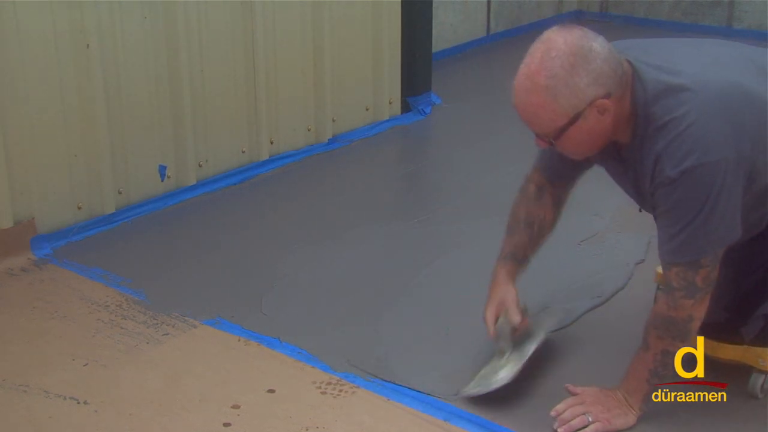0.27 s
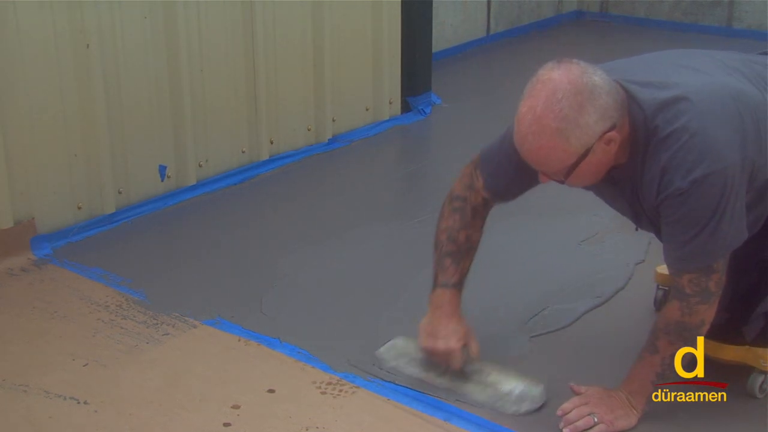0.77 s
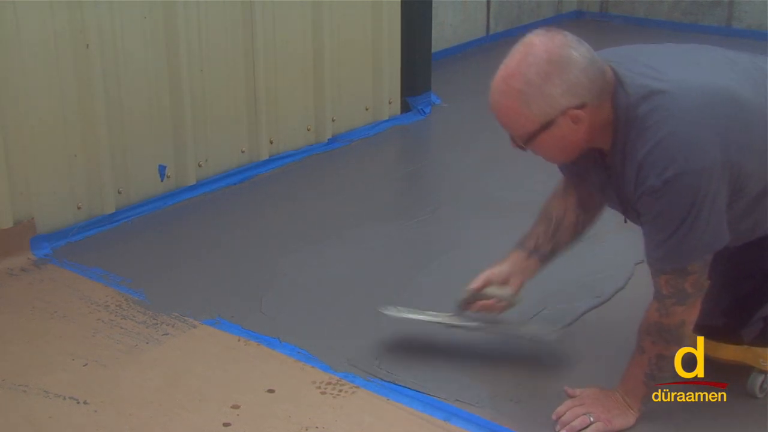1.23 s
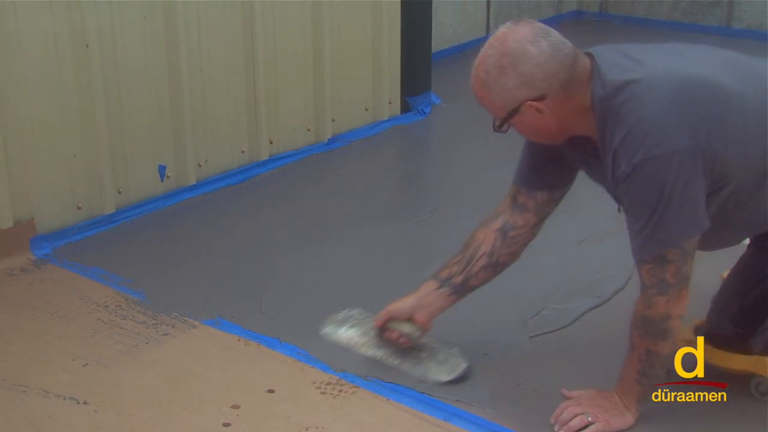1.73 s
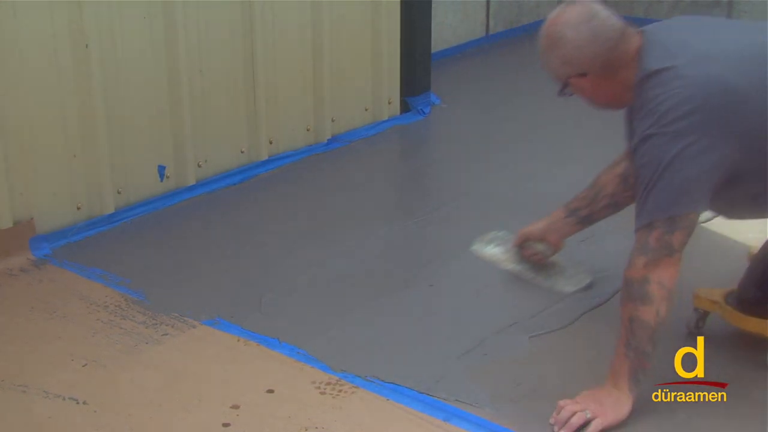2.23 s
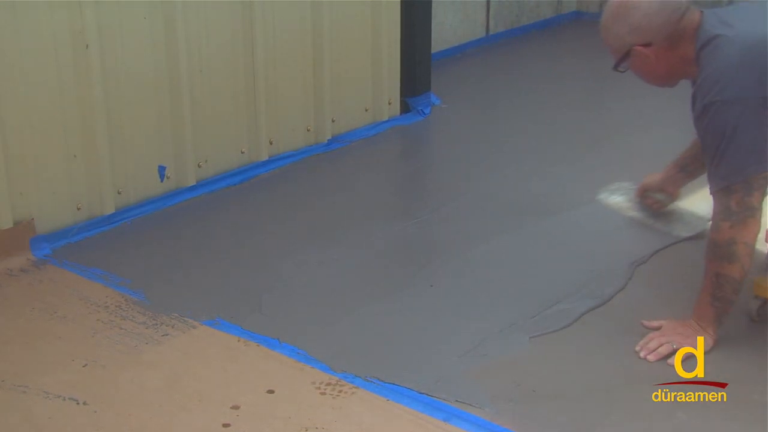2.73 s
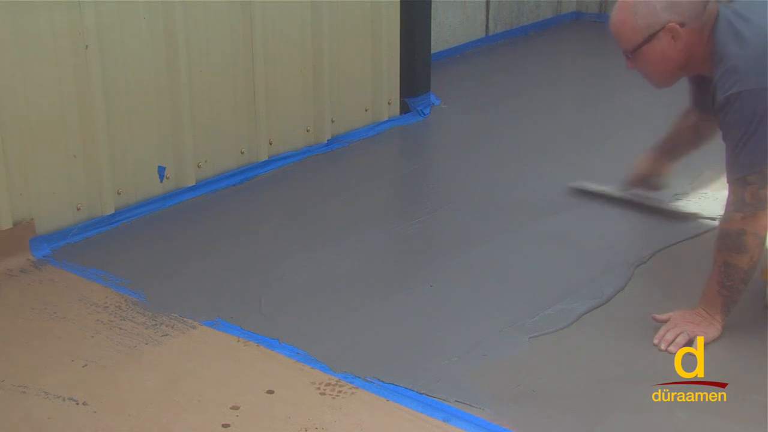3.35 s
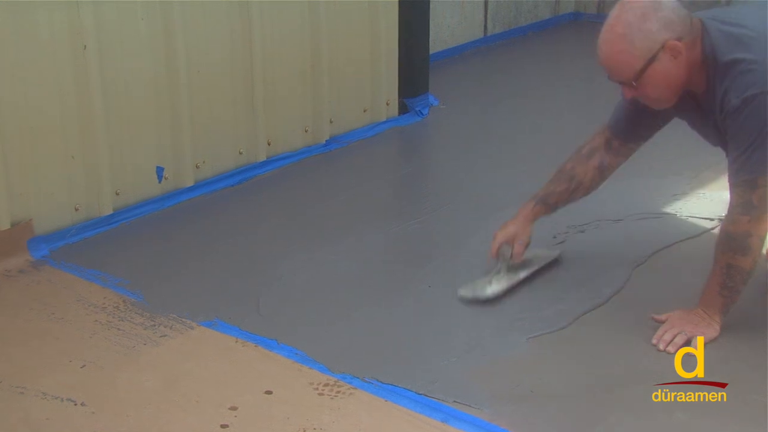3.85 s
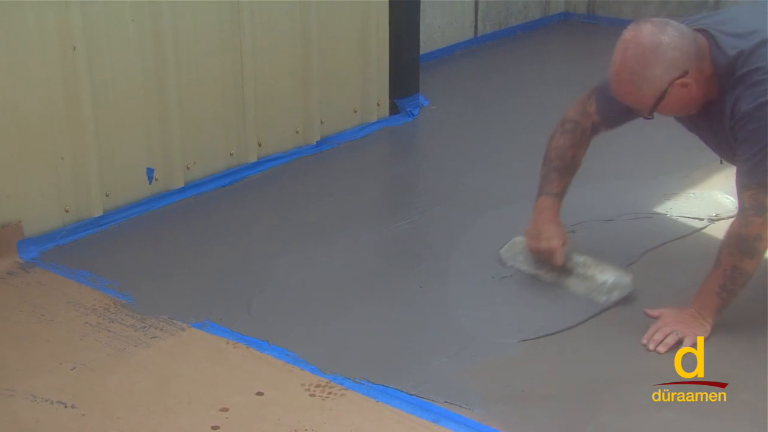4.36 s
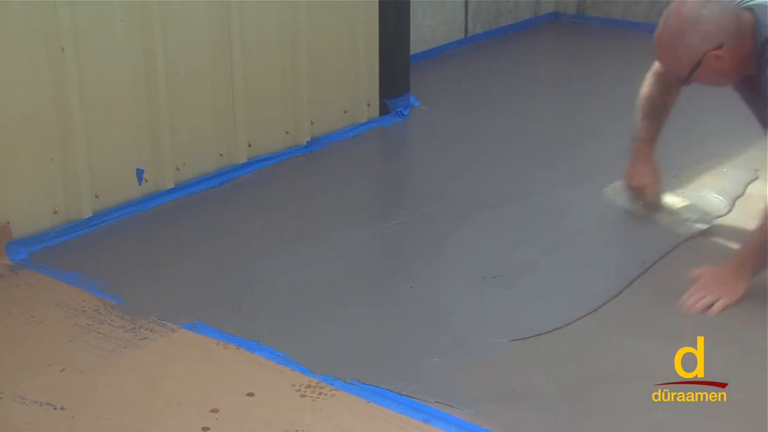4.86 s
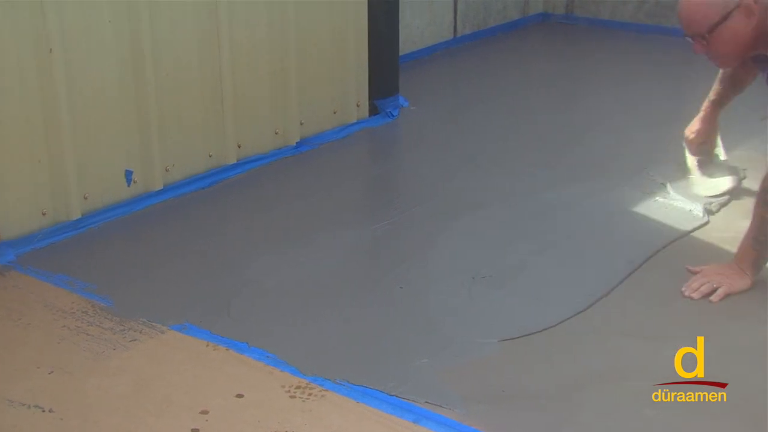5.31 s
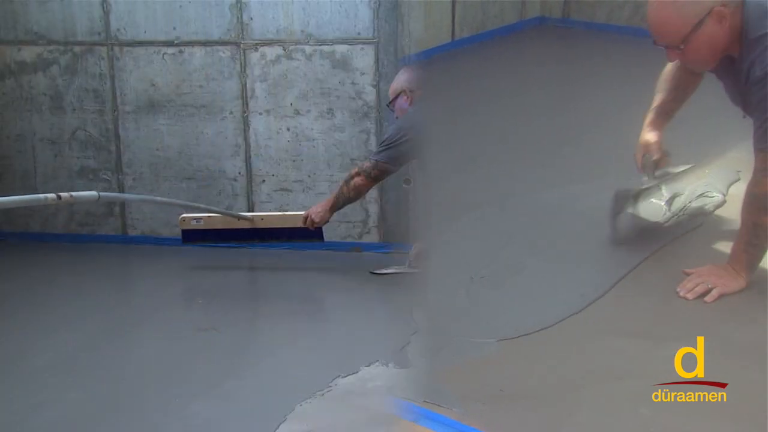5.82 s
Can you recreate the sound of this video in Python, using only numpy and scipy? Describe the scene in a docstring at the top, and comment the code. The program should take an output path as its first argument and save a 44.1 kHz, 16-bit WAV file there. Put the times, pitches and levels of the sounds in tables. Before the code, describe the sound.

A steel trowel rasps over gritty wet concrete in uneven strokes, two loud scrapes first, then softer swishes, over faint outdoor rumble.

```python
"""A steel trowel spreads wet concrete outdoors: sand grains striking its edge excite the damped resonances
of the blade in rasping strokes, while single coarse grains snap. Between strokes the flat blade glides
with fine crackle and hiss, and now and then friction makes its edge sing faintly in blurred partials.
Dull bumps of filtered impacts come from the worker shifting about; nearby walls answer with a short
diffuse tail, over low outdoor noise and a far motor of a few harmonic orders."""
import sys
import numpy as np
from scipy import signal
from scipy.fft import rfft, irfft, next_fast_len
from scipy.io import wavfile
from scipy.ndimage import map_coordinates

SR = 44100
rng = np.random.default_rng(int(sys.argv[2]) if len(sys.argv) > 2 else 0)


def materialize(psi):
    """Save the field psi as 16-bit PCM at rate SR to the path in sys.argv[1].

    A 1-D psi becomes a single channel; in a 2-D psi each row is a channel.
    """
    bounded = np.clip(np.atleast_2d(psi).T, -1, 1)
    quanta = np.round(bounded * 32767).astype(np.int16)
    wavfile.write(sys.argv[1], SR, quanta)


N = 268216

# spectrum of sand under the edge: f/Hz, level/dB
SAND_SPECTRUM = [(300, -7), (1000, 0.5), (2700, -5.5), (3700, -3), (5700, -1), (7000, -4.5), (10000, -2.5),
                 (15000, -3.5)]


def amp(db):
    """Level to amplitude ratio: 20 dB is a factor of ten."""
    return 10 ** (np.asarray(db) / 20)


def unit(x):
    """Normalization to a root-mean-square amplitude of 1."""
    return x / np.sqrt(np.mean(x ** 2) + 1e-20)


def along(points, hz):
    """Linear interpolation of (f/Hz, value) points on a logarithmic frequency axis."""
    f, value = np.transpose(points)
    return np.interp(np.log(hz + 1), np.log(f + 1), value)


def wobble(rate, size):
    """Band-limited random modulation: a spline through `rate` normal deviates a second."""
    knots = rng.standard_normal(int(size * rate / SR) + 4)
    return map_coordinates(knots, [np.arange(size) * rate / SR])


def filtered(x, response):
    """Linear filtering: the spectrum of x times a response of frequency."""
    m = next_fast_len(len(x) + 8192)  # zero padding leaves room for the filter to ring
    return irfft(rfft(x, m) * response(np.fft.rfftfreq(m, 1 / SR)), m)[:len(x)]


def hump(hz, centre_hz, octaves):
    """Gaussian band-pass on a logarithmic frequency axis, its standard deviation in octaves."""
    return np.exp(-.5 * (np.log2((hz + 1) / centre_hz) / octaves) ** 2)


def add(track, s, sound):
    """Superposition: mix a sound into the track at time s."""
    part = track[max(round(s * SR), 0):][:len(sound)]
    part += sound[:len(part)]


def swell(t, rise, hold, fade):
    """Contact envelope: linear rise, hold, then exponential decay of 20 dB per `fade` seconds."""
    decay_db = -20 * np.maximum(t - rise - hold, 0) / fade
    return np.clip(t / max(rise, 1e-3), 0, 1) * amp(decay_db)


def sand(size, rate, spread_db, smooth_db):
    """Granular friction: random impacts of scattered grain sizes over the smooth noise of the fines."""
    hit = rng.random(size) < rate / SR  # rate in impacts per second
    size_db = spread_db * np.minimum(rng.standard_normal(size), 2) * 20 / 20
    grains = hit * rng.choice([-1, 1], size) * amp(size_db)
    return unit(unit(grains) + amp(smooth_db) * rng.standard_normal(size))


def blade(hz, direct=1.0):
    """Modal response: direct sound plus resonances of the blade, broad because the wet paste damps them."""
    # resonances of the steel blade: f/Hz, bandwidth/Hz, level/dB
    modes = [(500, 160, -3), (800, 56, 0), (1190, 140, -3), (2630, 300, -2.5), (4080, 110, -17.5),
             (5950, 300, -11)]
    return direct + sum(amp(db) * 1j * hz * width / (centre * centre - hz * hz + 1j * hz * width)
                        for centre, width, db in modes)


def rumble(low_db=-57, ebb_db_per_s=.5, far_db=-67, far_hz=600, far_octaves=1.22, thin_db=-77, thin_hz=7000):
    """Shaped random noise: a swelling low rumble, a faint far wash and a thin steady hiss."""
    # spectrum of the rumble: f/Hz, level/dB
    rumble_spectrum = [(15, -8), (30, 0), (55, 0), (75, -0.5), (105, -1.5), (150, -7.5), (220, -16),
                       (500, -22.5), (2000, -41), (16000, -78)]
    # swells of the rumble: t/s, half width/s, rise over the usual level/dB
    gusts = [(2.19, .06, 12.5), (4.72, .05, 3), (5.25, .12, 3)]
    t = np.arange(N) / SR
    gust_db = sum(db * np.exp(-.5 * ((t - s) / width) ** 2) for s, width, db in gusts)
    level_db = low_db - ebb_db_per_s * t + gust_db
    low = unit(filtered(rng.standard_normal(N), lambda hz: amp(along(rumble_spectrum, hz))))
    far = unit(filtered(rng.standard_normal(N), lambda hz: hump(hz, far_hz, far_octaves)))
    # a narrow band on a flat floor
    thin = unit(filtered(rng.standard_normal(N), lambda hz: hump(hz, thin_hz, 0.072) + 0.24))
    return amp(level_db) * low + amp(far_db) * far + amp(thin_db) * thin


def motor(start_hz=47.8, rise_hz_per_s=0.94, waver_db=3.5):
    """Harmonic orders of a far motor slowly gathering speed; each wavers on the way."""
    # level of the motor: t/s, level/dB
    motor_levels = [(0, -64), (.7, -56.5), (1.6, -55), (2.4, -60.5), (4.2, -64.5), (5.3, -58.5),
                    (6.08, -69.5)]
    # its orders: multiple of the fundamental, level/dB
    orders = [(1, 0), (2, -5.5), (3, -6)]
    t = np.arange(N) / SR
    times, levels_db = np.transpose(motor_levels)
    phase = 2 * np.pi * np.cumsum(start_hz + rise_hz_per_s * t) / SR
    drone = sum(amp(db + waver_db * wobble(6.5, N)) * np.sin(k * phase) for k, db in orders)
    return amp(np.interp(t, times, levels_db)) * unit(drone)


def walls(x):
    """Diffuse reflection: convolution with decaying noise whose treble dies first."""
    # decay of the tail: f/Hz, time to fall 60 dB/s
    decay_times = [(200, 0.58), (2000, 0.46), (10000, 0.11)]
    hz, t, noise = signal.stft(rng.standard_normal(SR // 2), SR, nperseg=256)
    decay = amp(-60 * t / along(decay_times, hz)[:, None])
    tail = signal.istft(noise * decay, SR, nperseg=256)[1]
    delayed = np.pad(x, (SR // 100, 0))  # 10 ms of travel
    return signal.fftconvolve(delayed, tail / np.linalg.norm(tail))[:N]


def bumps(rise=0.0015, hold=.018, octaves=.8):
    """Soft contact: low-rate impacts, band-passed to dull scuffs, as the worker moves his weight."""
    # knee board and hand shifting: t/s, fade per 20 dB/s, level/dB, centre f/Hz
    shifts = [(0.0, .09, -53, 400), (1.033, .06, -62, 600), (1.075, .1, -60, 650), (3.143, .08, -57.5, 750),
              (3.182, .13, -48.5, 540), (3.326, .06, -49, 850), (3.792, .08, -52, 115),
              (5.742, .19, -52, 720)]
    out, t = np.zeros(N), np.arange(SR // 3) / SR
    for s, fade, db, centre_hz in shifts:
        impacts = sand(len(t), rate=700, spread_db=2, smooth_db=-6)
        scuff = unit(filtered(impacts, lambda hz: hump(hz, centre_hz, octaves)))
        add(out, s, amp(db) * swell(t, rise, hold, fade) * scuff)
    return out


def sing(blur_rate=270, pitch_rise_hz_per_s=280, gain_db=-1):
    """Friction-driven vibration: the thin edge rings in partials blurred by random modulation."""
    # singing of the edge: t/s, rise/s, hold/s, fade per 20 dB/s, level before gain_db/dB, starting f/Hz
    tones = [(1.405, .04, .07, .25, -72, 3240), (1.679, .075, 0.048, 0.1, -49.5, 3320),
             (1.882, 0.094, 0.026, .36, -54.5, 3130)]
    # partials of the edge: frequency ratio, level/dB
    partials = [(.78, -13), (1, -7), (1.571, -15), (2.12, -15)]
    out, t = np.zeros(N), np.arange(SR // 2) / SR
    for s, rise, hold, fade, level_db, pitch_hz in tones:
        phase = 2 * np.pi * np.cumsum(pitch_hz + pitch_rise_hz_per_s * t) / SR
        ring = np.zeros(len(t))
        for ratio, db in partials:
            in_phase = wobble(blur_rate * ratio, len(t)) * np.sin(ratio * phase)
            quadrature = wobble(blur_rate * ratio, len(t)) * np.cos(ratio * phase)
            ring += amp(db) * (in_phase + quadrature)
        add(out, s, amp(level_db + gain_db) * swell(t, rise, hold, fade) * unit(ring))
    return out


def ticks(t60=0.018, rise=0.00081, octaves=0.283, gain_db=1, crack_db=-12):
    """Impulsive excitation: a coarse grain catches, is crushed and flicks the blade."""
    # coarse grains snapping: t/s, peak level before gain_db/dB, pitch f/Hz
    snaps = [(0.157, -33, 2340), (0.222, -21, 2000), (0.274, -33, 3030), (1.822, -28, 1600),
             (2.321, -38, 2150), (2.413, -40, 2660), (2.496, -37, 2500), (3.276, -29.5, 2980),
             (3.578, -29, 2500), (3.941, -39, 2000), (4.838, -35, 1890), (4.878, -34, 2200),
             (4.907, -34.5, 1970), (5.167, -42, 1800), (5.955, -42, 2350)]
    out, t = np.zeros(N), np.arange(SR // 20) / SR
    for s, db, pitch_hz in snaps:
        crush = rng.standard_normal(len(t)) * amp(-60 * t / t60) * np.minimum(t / rise, 1)

        def response(hz):
            crack = amp(crack_db + along(SAND_SPECTRUM, hz))
            return blade(hz) * (hump(hz, pitch_hz, octaves) + crack)

        tick = filtered(crush, response)
        add(out, s, amp(db + gain_db) * tick / np.abs(tick).max())
    return out


def glide(paste_gain_db=-1.8, arch=0.58):
    """Sliding friction: fine wet crackle over a soft low swish, both following a power of blade speed."""
    # swings with the blade flat: start t/s, end t/s, hiss level/dB, paste level before paste_gain_db/dB
    swings = [(-0.03, .43, -60, -58.5), (.48, 1.45, -70, -59.5), (1.3, 2.524, -64, -57),
              (2.19, 3.13, -57.5, -57.5), (3.12, 4.4, -61, -62.5), (4.15, 5.17, -61.5, -64),
              (5.04, 5.67, -65.5, -57.5), (5.74, 6.102, -69, -65)]
    # spectrum of fines under the flat blade: f/Hz, level/dB
    smear_spectrum = [(300, -14), (1000, -11), (2700, -5), (4000, -8.5), (5700, -8.5), (9000, -6.5),
                      (14000, -4)]
    # spectrum of the wet paste: f/Hz, level/dB
    paste_spectrum = [(150, -1.5), (280, -1.5), (450, 1), (850, -1), (1400, -10.5), (2500, -18),
                      (5000, -17.5), (16000, -38)]
    t = np.arange(N) / SR
    hiss_gain, paste_gain = np.zeros(N), np.zeros(N)
    for start, end, hiss_db, paste_db in swings:
        speed = np.abs(np.sin(np.pi * np.clip((t - start) / (end - start), 0, 1)))
        swish = speed ** arch
        # overlapping swings add in power
        hiss_gain = np.hypot(hiss_gain, swish * amp(hiss_db))
        paste_gain = np.hypot(paste_gain, swish * amp(paste_db + paste_gain_db))
    drag_db = 1.17 * wobble(35.28, N)
    fines = sand(N, rate=1100, spread_db=6, smooth_db=1.5)
    hiss = unit(filtered(fines, lambda hz: amp(along(smear_spectrum, hz))))
    wet_sand = sand(N, rate=900, spread_db=4.5, smooth_db=1)
    paste = unit(filtered(wet_sand, lambda hz: amp(along(paste_spectrum, hz))))
    return amp(drag_db) * (hiss_gain * hiss + paste_gain * paste)


def scrapes(chatter_db=1.05, chatter_rate=260, clump_db=1.66, slab_share=0.39, flex=0.068, shove_octaves=0.75):
    """Source and filter: stick-slip sand noise excites the blade, whose tilt sets the pitch of the rasp."""
    # strokes of the edge: t/s, rise/s, hold/s, rasp level/dB, rasp f/Hz, rasp width/octaves,
    # shoved paste level/dB, paste f/Hz, hiss level/dB
    strokes = [(0.172, .038, .025, -30.5, 2050, .5, -33, 580, -37),
               (0.843, .021, .017, -24, 2200, 1, -33, 480, -30.5),
               (1.617, 0.016, .012, -50, 2500, 1.1, -53, 340, -55.5),
               (1.665, .08, .06, -46.5, 1680, 1.3, -49.5, 210, -51.5),
               (1.816, .002, .05, -41.5, 1310, .65, -46, 420, -70),
               (1.86, 0.047, .3, -50, 1400, 0.97, -59, 600, -61.5),
               (2.052, .018, 0.02, -44.5, 1200, .95, -51, 800, -58),
               (2.46, .1, .075, -45.5, 1800, 0.98, -56.5, 340, -48),
               (2.67, .065, .255, -43.5, 1450, 1.05, -50.5, 300, -44),
               (3.235, .007, .026, -47.5, 2750, .8, -60, 200, -57),
               (3.369, 0.0087, .003, -40.5, 1700, .68, -56, 330, -46.5),
               (3.4, .09, .036, -33.5, 2350, 1.05, -56, 390, -43),
               (3.553, .045, .11, -39, 2300, 0.95, -51, 450, -46),
               (3.905, .04, .03, -49, 1780, .66, -66, 500, -57.5),
               (3.965, .034, .088, -42, 1520, .8, -47, 560, -41.5),
               (4.77, .07, .12, -55, 1970, 0.61, -63, 240, -50),
               (4.928, .042, .036, -36.5, 1640, .58, -44.5, 250, -43.5),
               (5.176, .005, .009, -55, 1600, 0.62, -48, 218, -46.5),
               (5.239, .005, .015, -39.5, 1700, .95, -45, 210, -43),
               (5.295, 0.0051, .012, -58, 1100, .6, -49, 230, -44.5),
               (5.392, .013, .122, -44.5, 1300, 1.2, -36, 460, -45)]
    lead_s = .15  # room for the skim before the bite
    sag_db_per_s = 25  # the pressure eases as the arm stretches out
    lift_s, lift_per_rise = 0.04, .38  # fade per 20 dB; an edge set down gently also lifts gently
    dig_in, pile_up = .3, 1.1  # exponents: slow first hold of the edge, growth of the heap ahead
    skim_db, skim_s = -17.5, 0.03  # the edge skims lightly before it bites and after it lifts
    out, size = np.zeros(N), 2 * SR // 3
    t = np.arange(size) / SR - lead_s

    def grit(chatter):
        clumps = clump_db * wobble(chatter_rate, size)
        return amp(chatter + clumps) * sand(size, rate=4500, spread_db=5.0, smooth_db=-4.5)

    for s, rise, hold, rasp_db, rasp_hz, octaves, shove_db, shove_hz, hiss_db in strokes:
        pressure = swell(t, rise, hold, lift_s + lift_per_rise * rise)
        pressure = pressure * amp(-sag_db_per_s * np.maximum(t - rise, 0))
        pressure = pressure * np.clip(t / rise, 0, 1) ** dig_in
        skim = amp(skim_db) * np.exp(-np.abs(t - np.clip(t, rise, rise + hold)) / skim_s)
        heap = np.clip(t / (rise + hold), 0, 1) ** pile_up
        # the whole edge sticks and slips unevenly, and the sand passes it in clumps
        chatter = chatter_db * wobble(chatter_rate, size)
        # the slab mirrors the sound with a delay (s) that changes from place to place
        delay = rng.uniform(0.0006, 0.0024)
        # each stroke bends the blade differently, which shifts its resonances
        bend = np.exp(flex * rng.standard_normal())

        def steel(hz):
            return blade(hz * bend) * (1 + slab_share * np.exp(-2j * np.pi * hz * delay))

        rasp = unit(filtered(grit(chatter), lambda hz: steel(hz) * hump(hz, rasp_hz, octaves)))
        shove = unit(filtered(grit(chatter), lambda hz: steel(hz) * hump(hz, shove_hz, shove_octaves)))
        # the hiss leaves the contact directly, so the blade colours it less
        hiss = unit(filtered(grit(chatter), lambda hz: steel(hz) ** .5 * amp(along(SAND_SPECTRUM, hz))))
        bite = pressure * (amp(rasp_db) * rasp + amp(shove_db) * heap * shove)
        add(out, s - lead_s, bite + np.hypot(pressure, skim) * amp(hiss_db) * hiss)
    return out


def scene(wall_db=-25.5):
    """Superposition of trowel and worker, their wall reflections and the outdoor background."""
    work = scrapes() + glide() + ticks() + sing() + bumps()
    return (work + amp(wall_db) * walls(work) + rumble() + motor())[None]


def record(dry, top_hz=15900):
    """Band limitation: an ideal low-pass removes everything from top_hz upwards."""
    return np.array([filtered(channel, lambda hz: hz < top_hz) for channel in dry])


dry = scene()
out = record(dry)
materialize(out)
```